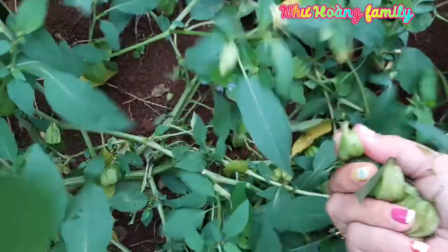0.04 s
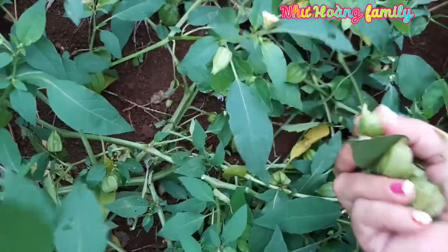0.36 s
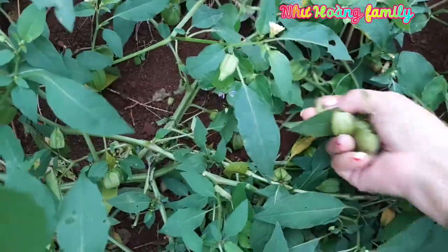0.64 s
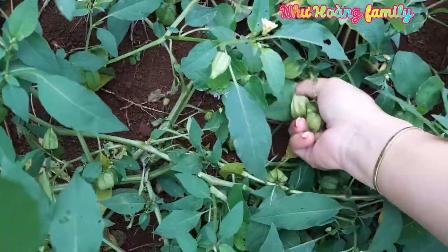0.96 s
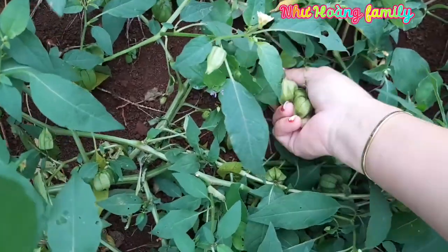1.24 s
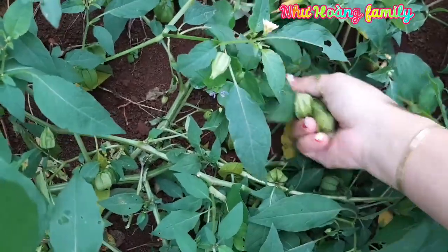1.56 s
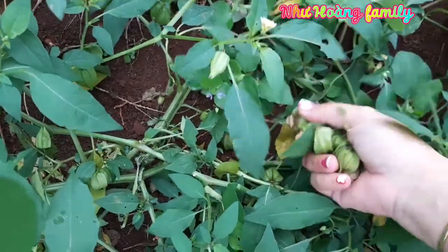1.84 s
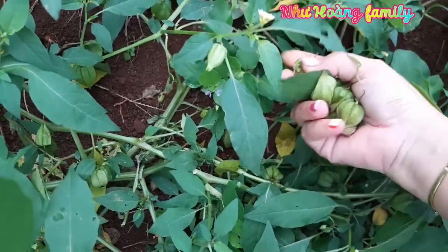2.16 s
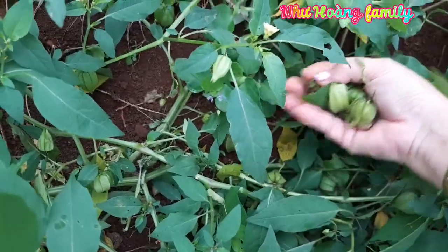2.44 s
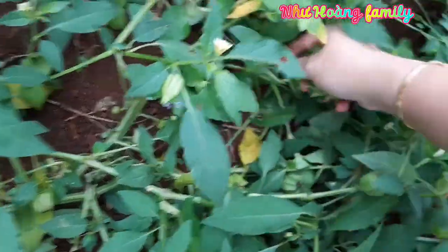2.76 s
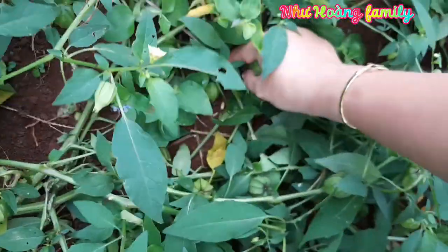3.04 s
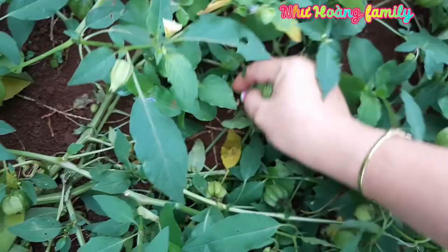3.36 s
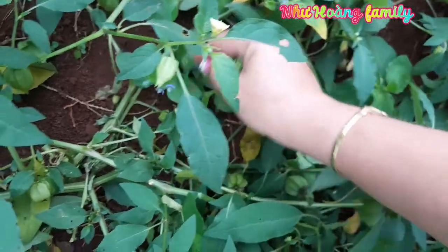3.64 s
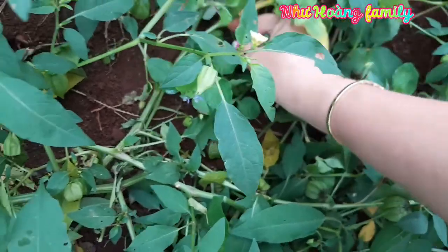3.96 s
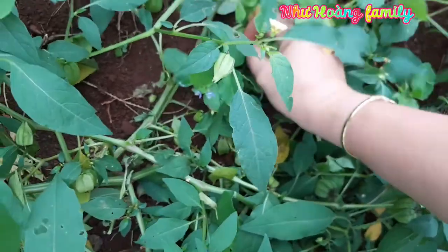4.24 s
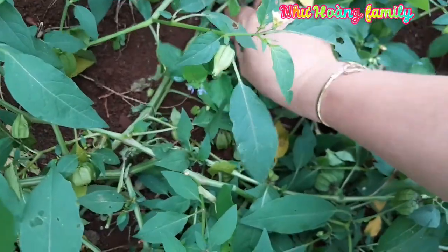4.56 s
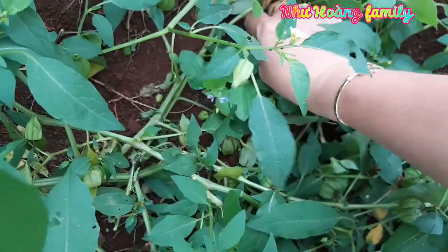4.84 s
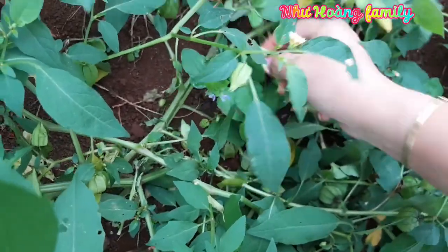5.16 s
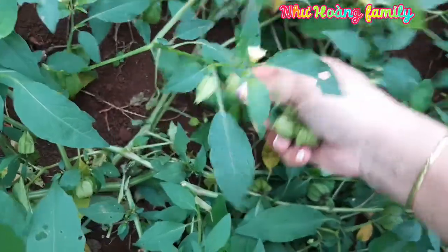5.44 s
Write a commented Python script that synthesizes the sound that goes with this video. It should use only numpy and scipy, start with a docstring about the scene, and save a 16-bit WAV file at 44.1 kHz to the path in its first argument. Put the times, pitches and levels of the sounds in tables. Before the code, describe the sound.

A low rumble of air and a faint, distant engine hum run throughout in a garden. Close to the microphone, a hand moves through low plants picking fruit: leaves softly rustle and rub, and husks tick. Stalks snap sharply at about 0.4 and 1.6 seconds, with a cluster of cracks near 5.4 seconds. The rustling grows a little busier from around 2.5 seconds. A faint bird on the left gives rising whistles at about 0.6, 1.8 and 5.4 seconds. Another gives thin, high falling calls at 1.1 and 4.2 seconds. The most prominent bird trills three short phrases of five quick upsweeps at about 2.7, 3.2 and 3.7 seconds, slightly scattered by the foliage. Wind thumps on the right side of the microphone at 4.3 seconds, then buffets it in short, low gusts from about 4.9 seconds to the end.

```python
"""A low rumble of air and a far engine lie under rustling leaves: fruit is picked from low garden plants.
Close by, leaves slip and rub, husks crackle and stalks ring as their fibres snap.
One bird gives rising whistles, another thin falling calls, a third trills three phrases of quick
upsweeps; the foliage scatters their song. Near the end, wind buffets the right microphone port."""
import sys
import numpy as np
from scipy import signal
from scipy.fft import rfft, irfft
from scipy.io import wavfile

SR = 44100
rng = np.random.default_rng(int(sys.argv[2]) if len(sys.argv) > 2 else 0)


def unload_audio(sound):
    """Save the sound as a 16-bit wav file, at the path given as the first command line argument."""
    columns = np.transpose(np.atleast_2d(sound))
    # keep every value between -1 and 1, then stretch to whole-number steps
    steps = np.round(np.clip(columns, -1, 1) * 32767)
    wavfile.write(sys.argv[1], SR, steps.astype(np.int16))


N = 246959
T = np.arange(N) / SR
BIN_HZ = np.arange(N // 2 + 1) * SR / N

# low rumble of the air (time [s], level [dB])
RUMBLE_LEVELS = [(0, -55.5), (.65, -53), (.95, -58.5), (1.25, -53.5), (2.2, -58), (2.6, -54.5), (3.9, -54),
                 (4.15, -57), (5.6, -55)]
# tone of the rumble (frequency [Hz], relative level [dB])
RUMBLE_EQ = [(22, -35), (31, -12.5), (40, -9.5), (52, 1), (64, 2.5), (80, -1.5), (115, -2.5), (160, -12.5),
             (240, -21), (320, -26), (480, -41), (900, -47)]
# distant garden hiss with a faint insect band (frequency [Hz], relative level [dB])
HISS_EQ = [(300, 17.5), (900, 2), (3000, -20), (4500, 0.5), (7000, 2), (7900, 13.5), (8800, 1.5),
           (15000, -0.5)]
# far engine (time [s], pitch [Hz], level [dB])
ENGINE_DRONE = [(0, 84.17, -50.5), (.5, 87.03, -52), (1.0, 95, -60.5), (1.3, 95.24, -55.5),
                (1.9, 102.4, -59.5), (2.9, 103.6, -64), (3.9, 109.4, -61), (4.7, 104.6, -64.5),
                (5.6, 104.6, -55)]
# the hand moving through the leaves (time [s], crisp rustle [dB], relative blade rub [dB])
HAND_LEVELS = [(0, -80, -77), (.2, -79.5, -85.5), (.55, -74.5, -84.5), (.7, -69, -81), (1.05, -75.5, -76),
               (1.5, -80.5, -84.5), (1.8, -76.5, -86.5), (1.95, -68.5, -82), (2.4, -73, -82),
               (2.55, -67.5, -80), (2.87, -62, -67.5), (3.05, -70.5, -81), (3.3, -67.5, -70.5),
               (3.52, -75, -87), (3.8, -69, -70.5), (4.35, -67, -69.5), (4.7, -71.5, -74),
               (4.92, -75.5, -81), (5.1, -64.5, -71.5), (5.6, -69.5, -79)]
# tugs at a fruit that shake the plant (time [s], length [s], crisp rustle [dB], relative blade rub [dB])
FRUIT_TUGS = [(0.021, 0.073, -67, -65.5), (0.413, 0.039, -62, -67), (1.658, 0.063, -69, -68),
              (3.66, 0.058, -58, -70.5), (4.05, 0.057, -59.5, -57), (4.798, 0.03, -62.5, -70),
              (5.4, 0.071, -61.5, -57.5)]
# tone of the crisp rustle (frequency [Hz], relative level [dB])
RUSTLE_EQ = [(600, -17.5), (2000, -0.5), (3100, 1.5), (5500, 6), (7000, 4), (8300, 5), (10000, 1),
             (13500, 4.5), (16000, -1.5)]
# tone of the rubbing blades (frequency [Hz], relative level [dB])
RUB_EQ = [(250, -5), (600, -7), (1150, -8), (1700, -1), (2300, -1), (3100, -7.5), (5000, -3.5), (9000, -37)]
# single leaves sweeping over the hand (time [s], length [s], level [dB], centre [Hz])
LEAF_BRUSHES = [(.61, 0.029, -63, 5860), (0.954, .035, -65.5, 5400), (1.032, 0.048, -65.5, 5140),
                (1.169, 0.039, -64.5, 5450), (1.648, .025, -63.5, 2460), (1.722, 0.037, -69, 2160),
                (1.935, 0.022, -64, 8100), (2.26, 0.019, -65, 4100), (3.642, 0.052, -56, 6620),
                (4.047, 0.021, -52, 4900), (4.198, .044, -63.5, 320), (4.616, 0.16, -70.5, 1990)]
# snapping stalks and husks (time [s], level [dB], centre [Hz], t60 [s])
STALK_SNAPS = [(.4388, -47.5, 2400, .016), (1.005, -58, 5400, .02), (1.257, -58, 4370, .02),
               (1.267, -57.5, 4500, .011), (1.6194, -39, 7600, .015), (2.498, -55.5, 7500, .045),
               (3.691, -58, 2200, .015), (4.546, -52, 7840, .01), (4.6, -55, 3200, .038),
               (5.3544, -39, 3600, .014), (5.3577, -44, 8090, .019), (5.3706, -38, 6000, .011),
               (5.3718, -45.5, 1720, .015), (5.372, -42, 13000, .025), (5.3795, -51, 2570, .02),
               (5.5336, -58, 8880, .014)]
# tone of breaking fibres (frequency [Hz], relative level [dB])
FIBRE_EQ = [(450, -10), (1000, -7), (1500, 0), (15000, -3)]
# rising whistles (start [s], length [s], first pitch [Hz], top pitch [Hz], accent level [dB])
RISING_CALLS = [(0.629, 0.14, 3700, 6800, -65), (1.84, 0.17, 3340, 6410, -58.5),
                (5.428, .2, 4270, 7670, -70)]
# contour of one rising whistle (length [share], pitch rise [share], gain [dB])
RISE_CONTOUR = [(0, 0, -18), (.35, 0.21, -13), (.6, 0.37, -12.5), (.81, 0.58, -12), (.95, .87, 0.5),
                (1, 1, -5), (1.06, .99, -23)]
# thin falling calls, one table each (time [s], pitch [Hz], relative level [dB])
FALLING_CALLS = [
    [(1.1, 8601, -74), (1.11, 8730, -64), (1.138, 8540, -52.5), (1.228, 8110, -54.5), (1.254, 8260, -49.5),
     (1.296, 7843, -60.5), (1.356, 7612, -52), (1.392, 7460, -53.5), (1.42, 7400, -71)],
    [(4.19, 8820, -80), (4.23, 8510, -55.5), (4.258, 8320, -60), (4.274, 8250, -49.5), (4.31, 7900, -45.5),
     (4.372, 7770, -44), (4.412, 7529, -54), (4.442, 7460, -53.5), (4.49, 7400, -70)],
]
# trills (start [s], first gap [s], longest sweep [s], first target pitch [Hz], strongest note [dB])
TRILL_PHRASES = [(2.7237, 0.048, 0.03, 5014, -38.5), (3.188, 0.051, 0.026, 4885, -37),
                 (3.6987, .0514, .025, 4873, -35.5)]
# one upsweep, lingering softly at its top (length [share], pitch rise [share], gain [dB])
UPSWEEP_CONTOUR = [(0, .02, -28.5), (.23, 0.171, -20), (.33, 0.4, -8), (.55, .64, -1.5), (.8, 0.867, -4.5),
                   (1, .96, -10.5), (1.25, 0.97, -23.5), (1.6, .97, -25)]
# gusts on the right port (time [s], length [s], level [dB])
PORT_GUSTS = [(4.279, .06, -35.5), (4.89, 0.028, -46.5), (5.179, 0.11, -32.5), (5.281, 0.031, -30),
              (5.474, 0.081, -40.5), (5.6, 0.039, -34.5)]
# tone of the gusts (frequency [Hz], relative level [dB])
GUST_EQ = [(25, -54), (38, -14), (55, 4), (85, 1), (120, -1), (180, -17.5), (260, -27.5), (350, -30),
           (600, -50.5), (1500, -64)]


def undb(db):
    """Decibels to gain."""
    return 10 ** (np.asarray(db) / 20)


def unit(x):
    """Scale to rms 1."""
    return x / np.sqrt(np.mean(x ** 2))


def curve(rows):
    """The columns of a table, joined by straight lines in time."""
    s, *columns = np.transpose(rows)
    return [np.interp(T, s, c) for c in columns]


def swell(s, length, db):
    """A bell-shaped rise and fall of gain around one moment."""
    return undb(db) * np.exp(-2 * np.minimum(((T - s) / length) ** 2, 20))


def walk(rate):
    """Smooth random wandering, rms 1."""
    return unit(signal.resample(rng.standard_normal(int(rate * N / SR) + 2), N))


def stereo_noise(likeness):
    """Two white noises with a given correlation."""
    centre = np.sqrt(likeness) * rng.standard_normal(N)
    return centre + np.sqrt(1 - likeness) * rng.standard_normal((2, N))


def colour(x, eq):
    """Shape with an EQ curve, rolling off past its ends; rms 1."""
    hz, db = np.transpose(eq)
    f = np.maximum(BIN_HZ, 1)
    gain = undb(np.interp(np.log(f), np.log(hz), db))
    skirts = np.minimum(f / hz[0], 1) ** 2 * np.minimum(hz[-1] / f, 1) ** 2
    return unit(irfft(rfft(x) * gain * skirts, N))


def resonate(x, hz, q):
    """One broad resonance, scaled so that white noise keeps its power."""
    b, a = signal.iirpeak(hz, q, fs=SR)
    return signal.lfilter(b, a, x) / np.sqrt(b[0])


def place(x, lead_ms, pan_db):
    """A source off centre reaches one port earlier and louder; positive is left."""
    side = np.array([[1], [-1]]) / 2
    delay = np.exp(2j * np.pi * BIN_HZ * side * lead_ms / 1000)
    return irfft(rfft(x) * delay, N) * undb(side * pan_db)


def echo(x, delay_s, db):
    """One reflection, later and weaker."""
    return undb(db) * np.interp(T - delay_s, T, x)


def foliage(x, near_db, near_t60, far_db, far_t60):
    """Ground and near leaves scatter the sound at once; trees further off add a thin tail."""
    t = T[:SR // 2]
    response = 0
    for db, t60 in ((near_db, near_t60), (far_db, far_t60)):
        echoes = rng.standard_normal((2, len(t))) * undb(-60 * t / t60) * (t > .004)
        response = response + undb(db) * unit(echoes) / np.sqrt(len(t))
    return signal.fftconvolve(np.atleast_2d(x), response, axes=1)[:, :N]


def garden_air():
    """The bed: a rumble common to both ports and a wide, far hiss."""
    rumble = colour(stereo_noise(.88), RUMBLE_EQ) * undb(curve(RUMBLE_LEVELS)[0] + 1.86 * walk(9))
    hiss = colour(stereo_noise(.075), HISS_EQ) * undb(-75.5 + 1.8 * walk(9))
    return place(rumble, lead_ms=.1, pan_db=1) + hiss


def engine():
    """Only the firing note and a little of its overtones carry this far."""
    hz, db = curve(ENGINE_DRONE)
    phase = 2 * np.pi * np.cumsum(hz * (1 + .01474 * walk(7.2))) / SR
    tone = np.sin(phase) + undb(-19) * np.sin(2 * phase) + undb(-26.5) * np.sin(3 * phase)
    return tone * undb(db + 1.63 * walk(11))


def crackle(spread_db, likeness):
    """Dense tiny slips of very unequal size, each about a millisecond long."""
    slip_samples = 40
    sizes = undb(spread_db * np.minimum(rng.exponential(size=N // slip_samples + 1), 5))
    return unit(stereo_noise(likeness) * np.repeat(sizes, slip_samples)[:N])


def patchy(x, depth_db, rate):
    """Leaves of different sizes touch in turn, so each half octave from 1 kHz up swells on its own."""
    octave = np.log2(np.maximum(BIN_HZ, 1) / 1000).clip(0, 4)
    spectrum, out = rfft(x), 0
    for centre in np.arange(9) / 2:
        band = np.maximum(1 - 2 * abs(octave - centre), 0)
        out = out + irfft(spectrum * band, N) * undb(depth_db * walk(rate))
    return unit(out)


def leaves():
    """Crisp edges crackle and broad blades rub, more so at each tug."""
    crisp = patchy(colour(crackle(spread_db=3.4, likeness=.35), RUSTLE_EQ), depth_db=2.5, rate=22)
    dull = patchy(colour(crackle(spread_db=2.8, likeness=.55), RUB_EQ), depth_db=2.8, rate=25)
    rustle, rub = undb(curve(HAND_LEVELS))
    for s, length, rustle_db, rub_db in FRUIT_TUGS:
        rustle = np.hypot(rustle, swell(s, length, rustle_db))
        rub = np.hypot(rub, swell(s, length, rub_db))
    crisp = crisp * rustle * undb(1.5 * walk(40))
    dull = dull * rub * undb(-2 + 2 * walk(35))
    return place(crisp, lead_ms=0, pan_db=-.12) + place(dull, lead_ms=0, pan_db=4.2)


def husk_ticks(per_s=2.3, db=-65.5, spread_db=.5, hz=7060, t60=.017):
    """Dry husks tick faintly at random moments; rows like those of the snaps."""
    chance = rng.uniform(-1, 1, (int(per_s * T[-1]), 3))
    return [(abs(when) * (T[-1] - .1), db + spread_db * size, hz * 2 ** (pitch / 2), t60)
            for when, size, pitch in chance]


def stalks():
    """Fibres break in a short burst that rings the stalk or the hollow husk."""
    fibres = colour(stereo_noise(.6), FIBRE_EQ)
    snaps = np.zeros((2, N))
    t = T[:SR // 20]
    for s, db, hz, t60 in list(STALK_SNAPS) + husk_ticks():
        i = int(s * SR)
        burst = fibres[:, i:i + len(t)] * undb(-60 * t / t60)
        snap = resonate(burst, hz, q=3.8) + undb(-15) * burst
        snap = unit(snap) * np.sqrt(.004 / t[-1])  # the energy of 4 ms at rms 1
        pan_db = 3.2 * np.log2(6000 / hz)  # dull knocks sit left, bright ticks slightly right
        snaps[:, i:i + len(t)] += snap * undb(db + np.array([[pan_db], [-pan_db]]) / 2)
    scattered = foliage(snaps, near_db=-17, near_t60=.041, far_db=-12, far_t60=.17)
    return place(snaps, lead_ms=-.022, pan_db=0) + scattered


def leaf_brushes():
    """One leaf sweeps over the hand, rung by a run of slips."""
    slips = crackle(spread_db=2.5, likeness=.22)
    strokes = np.zeros((2, N))
    for s, length, db, hz in LEAF_BRUSHES:
        span = abs(T - s) < 2 * length
        ring = resonate(slips[:, span], hz, q=2.4)
        stroke = unit(resonate(ring, hz, q=.8))
        strokes[:, span] += stroke * swell(s, length, db)[span]
    return place(strokes, lead_ms=0, pan_db=.95)


def whistle(rows, waver, flutter_db):
    """A nearly pure tone along its pitch curve, never quite steady."""
    hz, db = curve(rows)
    gate = np.clip(np.minimum(T - rows[0][0], rows[-1][0] - T) / .0083, 0, 1)
    phase = 2 * np.pi * np.cumsum(hz * (1 + waver * walk(160))) / SR
    return np.sqrt(2) * np.sin(phase) * gate * undb(db + flutter_db * walk(130))


def rising_bird():
    """Faint whistles from far left that climb ever faster and end in an accent."""
    song = 0
    for start, length, first_hz, top_hz, db in RISING_CALLS:
        course = [(start + share * length, first_hz + rise * (top_hz - first_hz), db + shape_db)
                  for share, rise, shape_db in RISE_CONTOUR]
        song = song + whistle(course, waver=.0062, flutter_db=4.5)
    scattered = foliage(song, near_db=2, near_t60=.11, far_db=0, far_t60=.39)
    return place(song, lead_ms=.01, pan_db=15.7) + scattered


def falling_bird(gain_db=4):
    """Two thin, high calls that slide slowly down."""
    song = sum(whistle(rows, waver=.0028, flutter_db=2) for rows in FALLING_CALLS) * undb(gain_db)
    scattered = foliage(song, near_db=-9.5, near_t60=.19, far_db=-16.5, far_t60=.44)
    return place(song, lead_ms=.036, pan_db=-.8) + scattered


def trilling_bird(notes=5, base_hz=2072):
    """Fast upsweeps quicken and end lower through a phrase, growing longer and louder with effort."""
    quicken_s, sag_hz = .0013, 111.6  # per note
    strongest_note, scatter_db = 2.95, .6  # effort peaks here, counting from 0
    weak_db, weak_shortening = -7, .42  # the opening note is softer and shorter
    song = np.zeros(N)
    share, rise, shape_db = np.transpose(UPSWEEP_CONTOUR)
    for start, gap, longest, first_hz, db in TRILL_PHRASES:
        for k in range(notes):
            slack = (1 - k / strongest_note) ** 2
            length = longest * (1 - weak_shortening * slack)
            end = 1.15 if k == notes - 1 else share[-1]  # the closing note breaks off early
            progress = np.arange(0, end, 1 / (length * SR))
            top_hz = first_hz - sag_hz * k
            hz = base_hz + (top_hz - base_hz) * np.interp(progress, share, rise)
            phase = 2 * np.pi * np.cumsum(hz) / SR
            tone = np.sqrt(2) * (np.sin(phase) + undb(-33) * np.sin(2 * phase))
            note_db = db + weak_db * slack + scatter_db * rng.standard_normal()
            envelope = undb(note_db + np.interp(progress, share, shape_db))
            i = int((start + k * gap - quicken_s * k * (k - 1) / 2) * SR)
            song[i:i + len(tone)] += tone * envelope * signal.windows.tukey(len(tone), .1)
    direct = song + echo(song, delay_s=.0021, db=-12)  # the ground bounce beats with the sweep
    carried = resonate(song, 4450, q=5) / 6 + song / 3  # the lingering tops carry furthest
    slap = place(echo(carried, delay_s=.012, db=-14.5), lead_ms=.06, pan_db=0)
    scattered = foliage(carried, near_db=2, near_t60=.18, far_db=-13.5, far_t60=.73)
    return place(direct, lead_ms=-.036, pan_db=1.3) + slap + scattered


def gusts():
    """Wind thumps on the right port and barely touches the left."""
    buffeting = colour(rng.standard_normal(N), GUST_EQ) * sum(swell(*gust) for gust in PORT_GUSTS)
    return buffeting * np.array([[.08], [1]])


def scene():
    """The garden bed, the picking hand, three birds and the gusts."""
    bed = garden_air() + engine()
    picking = leaves() + stalks() + leaf_brushes()
    birds = rising_bird() + falling_bird() + trilling_bird()
    return bed + picking + birds + gusts()


def record(dry):
    """The recorder cuts the top steeply."""
    top_hz = 15700
    return signal.sosfilt(signal.ellip(10, .2, 70, top_hz, fs=SR, output="sos"), dry)


dry = scene()
out = record(dry)
unload_audio(out)
```